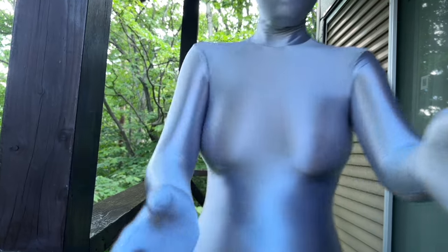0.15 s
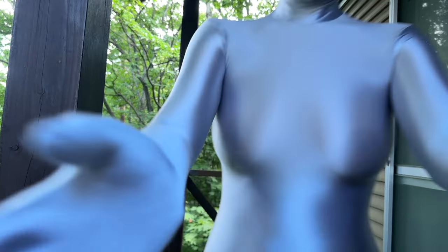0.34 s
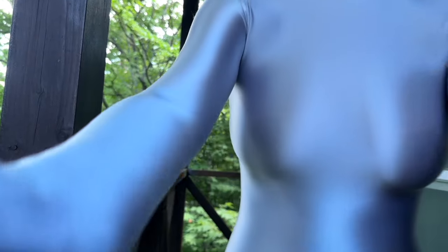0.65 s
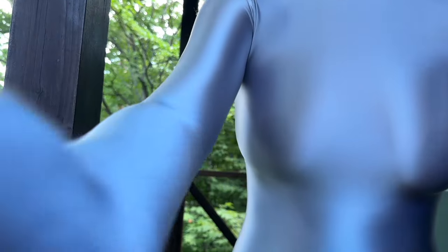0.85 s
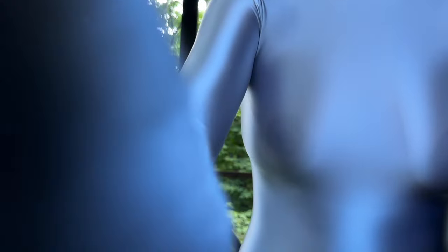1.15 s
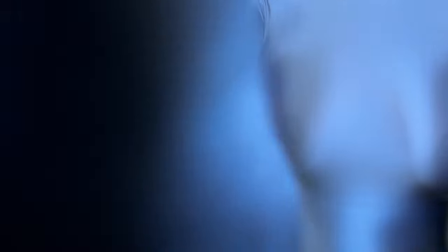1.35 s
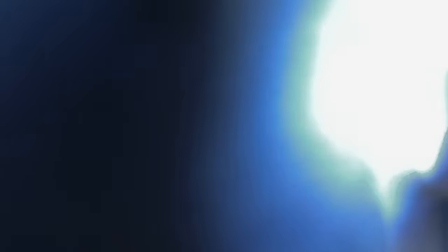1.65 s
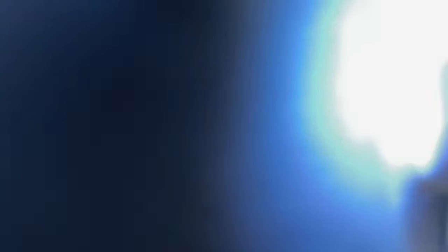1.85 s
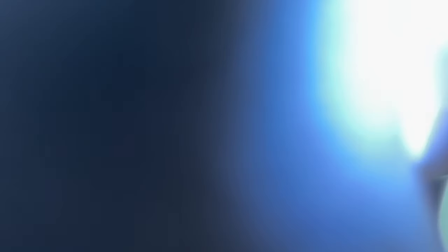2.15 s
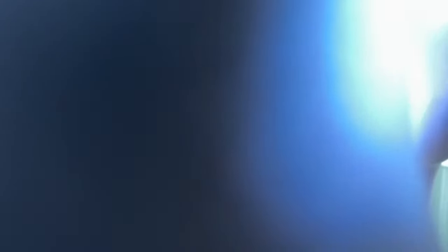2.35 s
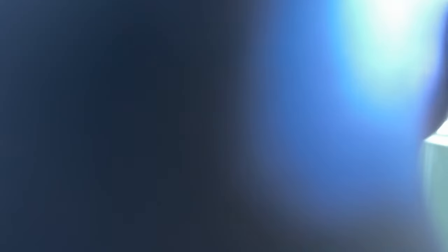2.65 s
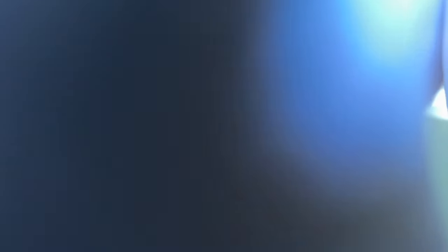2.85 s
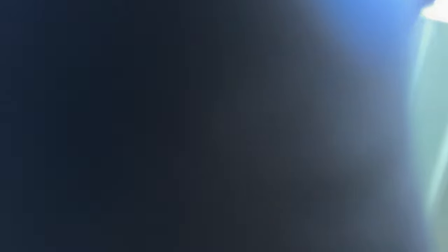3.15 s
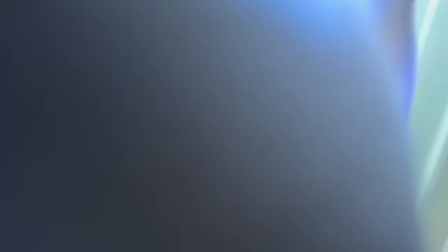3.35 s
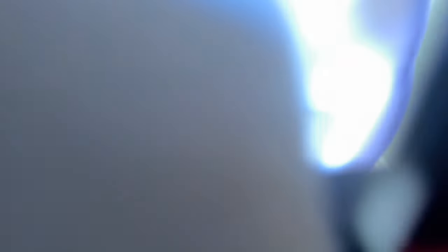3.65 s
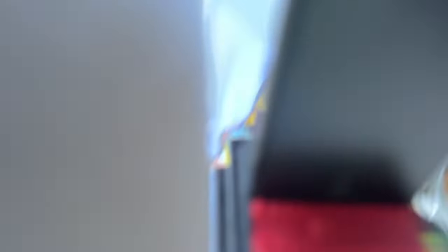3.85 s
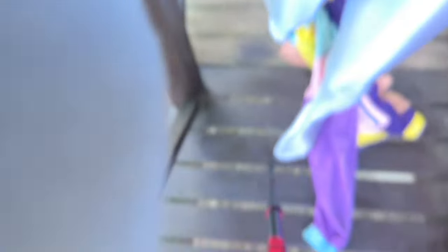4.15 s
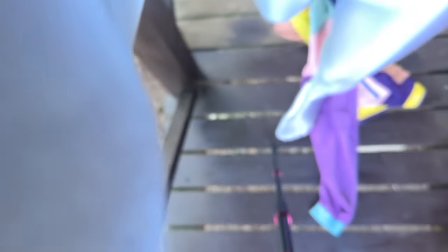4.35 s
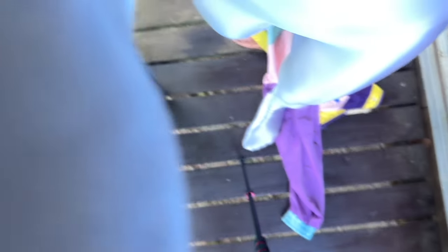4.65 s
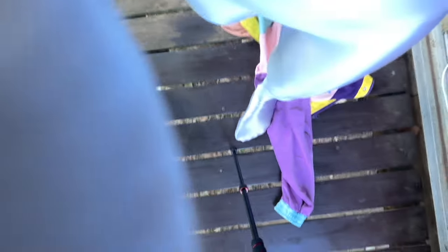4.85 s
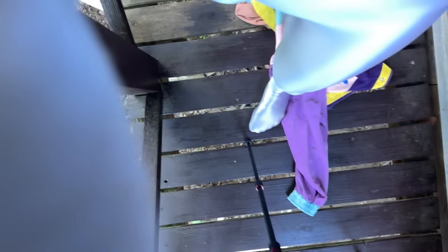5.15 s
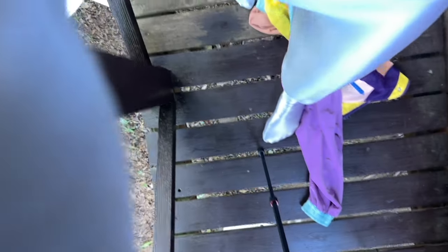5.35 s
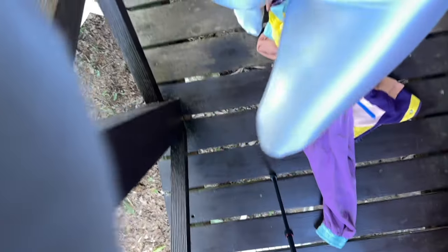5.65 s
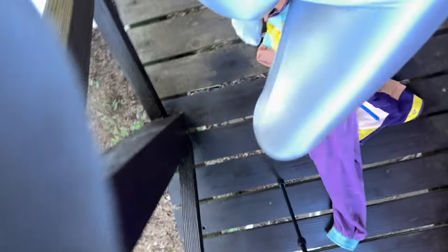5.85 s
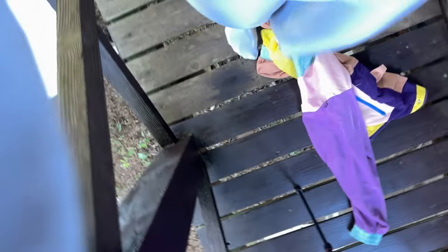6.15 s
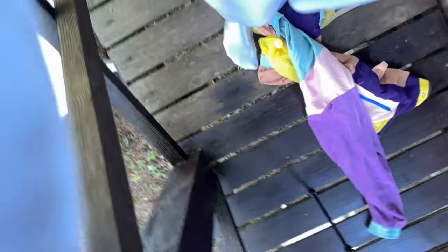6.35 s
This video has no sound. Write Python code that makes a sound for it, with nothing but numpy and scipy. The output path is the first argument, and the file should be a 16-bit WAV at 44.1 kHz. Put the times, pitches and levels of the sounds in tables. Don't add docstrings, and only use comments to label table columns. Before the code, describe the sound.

Quiet outdoor forest air: faint, steady leaf hiss, slightly hollow when a hand cups the microphone. A distant bird gives tiny flat chirps at 0-1 s, the clearest at 0.4, with a small tick and cloth swish. At 0.92 a loud hard plastic clack lands with a low thump. From 1.3 to 2.5 a bird whistles five short upward glides, soft and echoing, while knocks strike at 1.5, 1.75, 1.8 and more lightly after 2.2. Clicks at 2.7 lead into the busiest handling, 2.85-3.5: harsh grainy scrapes, a piercing chirp-like squeak near 2.93, another squeaky chatter around 3.17, rattling knocks and rocking low bumps. A last dull thump comes at 3.67. Then calm, with light sleeve rustles and faint far chirps. Two lower, richer bird notes at 4.8-5.0 open a louder phrase of five rising whistles from 5.3 to the end, ringing through trees, with a soft puff near 6.

```python
import sys
import numpy as np
from scipy import signal
from scipy.fft import rfft, irfft, next_fast_len
from scipy.io import wavfile
from scipy.ndimage import map_coordinates

SR = 44100
rng = np.random.default_rng(int(sys.argv[2]) if len(sys.argv) > 2 else 0)


def file_out(sig):
    cols = np.atleast_2d(sig).T
    lim = np.clip(cols, -1, 1)
    pcm = np.round(lim * 32767).astype(np.int16)
    wavfile.write(sys.argv[1], SR, pcm)


def gain_from_db(level_db):
    decades = np.asarray(level_db, float) / 20
    return 10 ** decades


N = 286650


def unit(x):
    return x / np.sqrt(np.mean(x ** 2) + 1e-20)


def filtered(x, response):
    m = next_fast_len(len(x) + 4096)
    return irfft(rfft(x, m) * response(np.fft.rfftfreq(m, 1 / SR)), m)[:len(x)]


def along(points):
    f, db = np.transpose(points)
    return lambda hz: gain_from_db(np.interp(np.log(hz + 1), np.log(f), db))


def resonances(modes):
    def response(f):
        total = 0
        for k, (centre, width, db) in enumerate(modes):
            damping = 1j * f * width
            total = total + (-1) ** k * gain_from_db(db) * damping / (centre * centre - f * f + damping)
        return total
    return response


def wobble(rate, size):
    knots = rng.standard_normal(int(size * rate / SR) + 4)
    return map_coordinates(knots, [np.arange(size) * rate / SR])


def noise(response, size):
    return unit(filtered(rng.standard_normal(size), response))


def add(track, s, x):
    part = track[round(s * SR):][:len(x)]
    part += x[:len(part)]


# time in seconds, grip force in dB, cupping over the microphone in dB.
HAND = [(0, -60.5, -8), (.3, -64.5, -4), (.92, -62.5, -1.5), (1.07, -61.5, 0.5), (1.38, -62, 4.5),
        (1.56, -54, 3.5), (2.35, -56, 5), (2.6, -61.5, 4.5), (2.82, -53, 2.5), (2.93, -41, 4),
        (3.03, -45, 2), (3.09, -50, 10.5), (3.26, -44, 7), (3.46, -49, 3.5), (3.65, -61.5, 1.5),
        (4.69, -61, -6), (5.77, -60.5, 0.5), (6.5, -61.5, 1)]
# start in seconds, end in seconds, hiss in dB.
STILL = (2.99, 3.066, -9)


def hand():
    s, *columns = np.transpose(HAND)
    grip_db, cup_db = (np.interp(np.arange(N) / SR, s, column) for column in columns)
    slide_from_db, slide_grows = -54.5, 0.56
    slide_db = slide_grows * np.clip(grip_db - slide_from_db, 0, None)
    start, end, still_db = STILL
    slide_db[round(start * SR):round(end * SR)] = still_db
    return grip_db, cup_db, slide_db


# frequency in Hz, level in dB per Hz.
LEAVES = [(59, -27.5), (100, -1), (167, -13.5), (204, -4), (458, -5.5), (571, -5.5), (919, -6.5),
          (1400, -8), (1780, -12), (2180, -7), (2470, -11.5), (3750, -20.5), (4600, -22.5), (8000, -33.5),
          (10400, -62), (17600, -120)]
# frequency in Hz, level in dB per Hz.
HISS = [(2000, -45), (4000, 4.5), (7000, 1.5), (10500, -6), (13000, -2), (16000, -1)]


def leaves(cup_db, slide_db):
    leaf_db, high_db = -57.5, -77
    muffle = 1
    low_level = leaf_db + slide_db + 1.2 * wobble(5.5, N) + 0.35 * wobble(2.7, N)
    high_level = high_db - muffle * cup_db + 2.2 * slide_db + 1.3 * wobble(36, N)
    return gain_from_db(low_level) * noise(along(LEAVES), N) + gain_from_db(high_level) * noise(along(HISS), N)


# frequency in Hz, level in dB per Hz.
RUMBLE = [(20, -41), (35, -13), (60, 1.5), (110, -13), (200, -11.5), (400, -51.5)]
# centre in Hz, width in Hz, level in dB.
CUP = [(1214, 650, 8), (2150, 240, 2)]


def held_body(grip_db, cup_db):
    rumble = gain_from_db(grip_db + 2.5 * wobble(16, N)) * noise(along(RUMBLE), N)
    cup = filtered(noise(resonances(CUP), N), resonances(CUP))
    return rumble + gain_from_db(-63.5 + cup_db) * unit(cup)


# start in seconds, rise in seconds, level in dB.
WHISTLES = [
    (1.275, .072, -67),
    (1.567, .085, -68.5),
    (1.845, 0.083, -67.5),
    (2.145, 0.076, -66),
    (2.432, .08, -66),
    (5.268, 0.087, -59.5),
    (5.528, .088, -59.5),
    (5.817, 0.084, -59),
    (6.085, 0.073, -57.5),
    (6.38, .072, -56.5),
]
# start and length in seconds, start and end pitch in Hz, level in dB.
OPENING = [
    (4.756, 0.061, 3290, 3465, -64.5),
    (4.975, .085, 3620, 4860, -61.5),
]
# start and length in seconds, start and end pitch in Hz, level in dB.
FAR_NOTES = [
    (0.046, 0.04, 2970, 2850, -61.5),
    (.375, 0.034, 3140, 3440, -60.5),
    (0.393, .04, 3350, 3530, -49.5),
    (0.947, 0.038, 3400, 3500, -62),
    (3.905, 0.028, 2860, 2900, -59),
    (4.173, .07, 3390, 3510, -66),
    (4.603, 0.029, 2980, 2940, -71),
]


def birds():
    out, t = np.zeros(N), np.arange(SR) / SR
    # the note, then octave at start and at end (dB), echo (dB)
    calls = []
    for s, length, db in WHISTLES:
        vary = 1 + .005 * rng.standard_normal(2)
        calls.append((s, length, 4300 * vary[0], 5400 * vary[1], db, -38, -22, 1.5 if s < 3 else 5))
    calls += [(*note, -5, -24, 4) for note in OPENING]
    calls += [(*note, -24, -26, -6) for note in FAR_NOTES]
    flick = 16
    for s, length, hz0, hz1, db, octave0_db, octave1_db, wet_db in calls:
        u = np.linspace(0, 1.3, round(1.3 * length * SR))
        rise = np.clip(u, 0, 1)
        glide = np.sin(.9 * rise ** 1.15) / np.sin(.9) - flick * np.clip(u - .96, 0, 1) ** 2
        pitch = (hz0 + (hz1 - hz0) * glide) * (1 + 0.006 * wobble(200, len(u)))
        phase = 2 * np.pi * np.cumsum(pitch) / SR
        swell = np.interp(u, [0, .1, .35, .8, .98, 1.15, 1.25], [0.01, 0.5, 0.96, 0.9, 0.63, 0.5, .01])
        octave = gain_from_db(octave0_db + (octave1_db - octave0_db) * rise) * np.sin(2 * phase)
        flutter = unit(gain_from_db(2.6 * wobble(130, len(u))))
        call = (np.sin(phase) + octave) * swell * flutter
        decay = (gain_from_db(-60 * t / .42) + gain_from_db(-7 - 60 * t / 1.5)) * (1 - np.exp(-t / .004))
        trees = rng.standard_normal(len(t)) * decay * gain_from_db(1.2 * wobble(49, len(t)))
        add(out, s, gain_from_db(db) * call)
        add(out, s, gain_from_db(db + wet_db) * signal.fftconvolve(call, trees / np.linalg.norm(trees)))
    return out


# centre in Hz, width in Hz, level in dB.
CAVITY = [(1416, 190, -2), (2100, 500, -3), (5660, 600, 0.21), (6840, 510, -2), (10500, 1302, -0.2)]


def friction(strokes):
    out = np.zeros(N)
    for start, peak, end, db, hz, width in strokes:
        size = round((end - start) * SR)
        t = start + np.arange(size) / SR
        stroke = np.sin(np.pi / 2 * np.interp(t, [start, peak, end], [0, 1, 0])) ** 1.8
        pocket = np.clip((db + 78.5) / 22, .2, 2.2)

        def band(f):
            colour = np.exp(-.5 * (np.log2((f + 1) / hz) / width) ** 2)
            gap = 1 - .6 * np.exp(-((f - 4300) / 300) ** 2)
            return colour * (1 + pocket * np.abs(resonances(CAVITY)(f))) * gap

        press = np.clip(0.04 * (db + 71.0), 0, 6)
        grain_db = press * (wobble(400, size) + 0.34 * wobble(82, size))
        add(out, start, gain_from_db(db) * stroke * unit(gain_from_db(grain_db) * noise(band, size)))
    return out


# start in seconds, length in seconds, level in dB, band width in octaves.
SWISHES = [(0, 0.2, -69.5, 3), (0.514, 0.18, -57.5, 1.3), (0.86, 0.12, -68, 1.2), (0.945, 0.8, -65, 5.9),
           (1.134, 0.17, -58.5, 4.9), (1.271, 0.16, -63.5, 2), (1.446, 0.1, -66, .8),
           (2.585, 0.09, -69, .7), (2.826, 0.12, -56, .65), (3.509, 0.3, -64.5, 2.6),
           (3.922, 0.079, -66.5, .9), (4.07, 0.1, -63.5, 1.7), (4.101, 0.96, -71, 2),
           (4.568, 0.17, -69, .6), (4.764, 0.089, -68, .76), (5.266, 0.1, -74, 0.51),
           (5.256, 0.55, -77.5, 2), (3.702, 0.48, -77.5, 2), (5.517, 0.082, -61.5, 1.2),
           (5.575, 0.05, -66, .9), (5.897, 0.24, -62, 3.3), (5.85, 0.78, -68.5, 2.3)]


def swishes():
    return friction([(s, s + 0.3 * length, s + length, db, 9660, width) for s, length, db, width in SWISHES])


# start, peak and end in seconds,
# level in dB, centre in Hz, width in octaves.
PORT = [
    (1.1, 2.3, 2.9, -66.5, 2150, .05),
    (5.551, 5.95, 6.9, -67, 1974, .07),
    (5.9, 5.99, 6.08, -59, 1500, .8),
]


def port_breaths():
    return friction(PORT)


# start, peak and end in seconds, shell level in dB, plates in dB over the shell.
SCRAPES = [(2.855, 2.875, 3.02, -47, -14), (2.929, 2.938, 2.966, -28, 6), (2.955, 2.965, 2.998, -43, -3),
           (2.984, 3.0, 3.02, -42, 1), (3.005, 3.029, 3.038, -41.5, 1), (3.067, 3.106, 3.23, -51, -4),
           (3.131, 3.198, 3.2, -35.5, 4.5), (3.196, 3.202, 3.28, -45.5, -2.5),
           (3.25, 3.338, 3.41, -40.5, -7), (3.37, 3.432, 3.62, -50.5, -9), (3.454, 3.475, 3.514, -43, -7.5),
           (3.6, 3.669, 3.67, -60, -3)]
# centre in Hz, width in octaves.
SCRAPED = [
    (1900, 0.8),
    (8500, 1.98),
    (356, 0.349),
]


def scrapes():
    strokes = []
    for *times, db, plate_db in SCRAPES:
        body_db = -44 + .8 * (db + 39)
        for level, part in zip((db, db + plate_db, body_db), SCRAPED):
            strokes.append((*times, level, *part))
    return friction(strokes)


def stick_slip(table, rough, octave_db, smear):
    out = np.zeros(N)
    for start, length, hz0, hz1, db in table:
        u = np.linspace(0, 1, round(length * SR))
        pitch = (hz0 + (hz1 - hz0) * u) * (1 + smear * wobble(580, len(u)))
        phase = 2 * np.pi * np.cumsum(pitch) / SR
        tone = np.sin(phase) + gain_from_db(octave_db) * np.sin(2 * phase) * (hz0 < 7500)
        size = 1 - rough + rough * wobble(760, len(u))
        add(out, start, gain_from_db(db + 1.5) * size * np.sin(np.pi * u) ** 0.692 * tone)
    return out


# start and length in seconds, start and end pitch in Hz, level in dB.
SQUEAKS = [
    (2.9315, 0.0135, 8970, 9000, -10.5),
    (3.157, .015, 5480, 5650, -24.5),
    (.93, 0.03, 9650, 9620, -63),
    (4.165, 0.09, 12780, 12460, -71.5),
    (4.27, 0.039, 12000, 10900, -69.5),
    (4.32, .1, 11480, 11000, -76),
    (4.42, .07, 10770, 9220, -82),
]
# start and length in seconds, start and end pitch in Hz, level in dB.
PINCH = [
    (3.095, .013, 5040, 4900, -37.5),
]
# start and length in seconds, start and end pitch in Hz, level in dB.
CHATTER = [(3.16, .035, 10400, 10700, -30), (3.18, 0.013, 7100, 7000, -30), (3.176, .02, 10000, 15000, -34),
           (3.31, .07, 6900, 6950, -49), (3.194, 0.0113, 5800, 5700, -21.5),
           (2.944, 0.016, 12000, 10500, -23.5), (2.94, .018, 3300, 3100, -26),
           (3.17, .015, 2300, 2200, -35), (5.578, 0.019, 2200, 2150, -53),
           (2.958, 0.023, 8500, 8270, -51.5), (3.29, .08, 5700, 5760, -50), (2.926, .009, 10500, 9050, -30),
           (2.94, .02, 1604, 1530, -20.5), (2.944, .016, 5100, 5240, -21),
           (2.949, 0.0072, 15100, 15200, -17), (2.978, 0.024, 1510, 1725, -35),
           (2.988, 0.025, 5400, 5150, -32.5), (2.6, 0.0046, 9500, 10300, -36),
           (3.0, .008, 13500, 13520, -33.5), (2.994, 0.021, 8900, 8500, -28.5),
           (2.996, .038, 4440, 3540, -30.5), (3.012, .02, 8300, 8340, -28),
           (3.013, .019, 12000, 11690, -32.5), (3.143, .017, 5550, 5400, -44),
           (3.172, 0.011, 5200, 5150, -22), (3.18, 0.0166, 5950, 5800, -22), (3.19, .015, 1446, 1430, -25),
           (3.205, 0.021, 5700, 5460, -39), (3.468, 0.028, 1460, 1390, -32)]


def clamp():
    clean = stick_slip(SQUEAKS, rough=0.3, octave_db=-16, smear=.006)
    pinch = stick_slip(PINCH, rough=.4, octave_db=-1, smear=.008)
    chatter = stick_slip(CHATTER, rough=0.62, octave_db=-14, smear=.02)
    return clean + pinch + chatter


def ring(modes, t):
    total = 0
    for hz, db, t60 in modes:
        total = total + gain_from_db(db + rng.normal(0, 1.5) - 60 * t / t60) * np.sin(2 * np.pi * hz * t)
    return total * (1 - np.exp(-t / .002))


# time in seconds, peak level in dB, rocking rate in Hz.
BUMPS = [(0.937, -35, 63), (1.189, -50, 93), (1.224, -45, 54), (1.536, -39.5, 97), (1.747, -45.5, 136),
         (1.885, -52, 69.4), (2.002, -41, 56.5), (2.27, -41, 56.5), (2.716, -48.5, 134),
         (2.812, -42.5, 111), (2.862, -35, 99), (2.887, -32, 129), (2.8953, -26, 76), (2.924, -27.5, 117),
         (2.964, -23, 59.97), (3.027, -35, 61.5), (3.069, -35, 86.5), (3.117, -34, 122.1),
         (3.199, -43, 116), (3.5042, -28, 68), (3.541, -43.5, 61.4), (3.671, -46, 61.6), (4.598, -47, 68.7),
         (5.329, -56, 54)]


def rocking():
    out, t = np.zeros(N), np.arange(SR // 4) / SR
    for s, db, hz in BUMPS:
        t60 = 0.16 * (80 / hz) ** .4
        modes = [(hz, 0, t60), (.65 * hz, -7, 2.5 * t60), (1.45 * hz, -8, 0.67 * t60)]
        add(out, s, gain_from_db(db + 3) * ring(modes, t))
    return out


# centre in Hz, width in Hz, level in dB.
PLATE = [(4500, 1900, -1), (6507, 1760, -1.5), (8480, 1900, -3.5), (10260, 1300, -1), (12500, 1500, -6),
         (14500, 1400, -10.5)]


def plates(f):
    return (1j * f / (1j * f + 3000)) ** 2 * resonances(PLATE)(f)


# time in seconds, peak level in dB.
TICKS = [(.1544, -53), (.182, -38.5), (1.4348, -43), (1.5104, -34), (1.6237, -50), (1.6497, -51),
         (1.688, -50), (1.9154, -61), (1.938, -60), (2.6753, -50), (2.6854, -54), (1.631, -44),
         (1.682, -52), (2.057, -49), (2.813, -47), (2.7017, -51), (2.7306, -58), (2.7377, -50),
         (2.8647, -28), (3.2793, -44), (3.403, -34), (3.4254, -44), (3.462, -46), (3.4753, -38),
         (6.394, -46.5)]


def ticks():
    out, t = np.zeros(N), np.arange(400) / SR
    for s, db in TICKS:
        tick = filtered(rng.standard_normal(400) * gain_from_db(-60 * t / 0.0088), plates)
        add(out, s - .0003, gain_from_db(db - 4.5) * tick / np.abs(tick).max())
    return out


# centre in Hz, width in Hz, level in dB.
SHELL = [(1204, 1200, -4), (2200, 2090, 0.5), (3803, 2000, -6)]
# frequency in Hz, level in dB, t60 in seconds.
BODY = [(183, -17, 0.11), (291, 1.5, 0.07), (364, 2, 0.036), (440, -5, .06), (563, -9, 0.017)]
# time in seconds, shell level in dB, bright crack and body knock
# in dB over the shell, struck spot in Hz.
KNOCKS = [(.9219, -25, -2, -23.5, 2200), (0.9247, -18, 9, 0, 990), (0.9266, -12, -6, -45, 4500),
          (1.5303, -18, 4, -12, 1920), (1.5394, -25.5, -2.5, -13, 2100), (1.7464, -27.5, -15, -8.5, 2150),
          (1.8165, -18.5, 4, -20, 1600), (1.8172, -17, -23, -40, 3920), (2.2012, -30, -7, -7, 1800),
          (2.268, -30.5, -8.5, -6, 1900), (2.345, -30.5, -15.5, -12, 1900), (2.4678, -32.5, -24, -13, 1900),
          (2.7085, -18.5, -14, -38, 1950), (2.715, -21, 1, -27, 3350), (2.861, -22.5, -24, -23.5, 1990),
          (2.8789, -28, -35, -11, 2070), (2.9151, -32, -30, -20, 2003), (2.9177, -24, -26, -14.5, 2040),
          (2.9267, -25, -10.5, -8, 1460), (2.9335, -21, -12, -19.5, 1500), (3.0682, -26, -7.5, -17, 2620),
          (3.0793, -25, -30, -33, 1460), (3.1178, -25, -10.5, -27.5, 1450),
          (3.4736, -30.5, -14.5, -6, 1590), (3.4874, -21, -17.5, -12.5, 1400),
          (3.499, -39.5, -14.5, -19.5, 2400)]
# time in seconds, shell level in dB, body knock in dB over the shell.
TOUCHES = [
    (1.1877, -44, -6),
    (1.6304, -35, -2),
    (1.68, -40.5, 6),
    (2.0006, -50, 1),
    (2.038, -54, 6),
    (2.0553, -36, -11),
    (2.259, -41, -10),
    (2.813, -40, -7),
    (3.513, -41, -16.5),
    (3.6743, -45.5, 9),
]


def knocks():
    out, t = np.zeros(N), np.arange(SR // 4) / SR
    hit_t60, spot_db = 0.012, 5
    rattle = gain_from_db(-12.5 - 60 * t / (3.3 * hit_t60))
    blow = (gain_from_db(-60 * t / hit_t60) + rattle) * (1 - np.exp(-t / 0.00023))
    touches = [(s, db, -22, knock_db, 1110) for s, db, knock_db in TOUCHES]
    for s, db, crack_db, knock_db, hz in KNOCKS + touches:
        hit = rng.standard_normal((2, len(t))) * blow
        hit[:, 12] += [5.5, 2.5]

        def struck_shell(f):
            dull = (1j * f / (1j * f + 520)) ** 2 / (1 + 1j * f / 6000) ** 3
            return dull * (resonances(SHELL)(f) + resonances([(hz, .3 * hz, spot_db)])(f))

        shell = filtered(hit[0], struck_shell)
        plate = filtered(hit[1] * gain_from_db(-60 * t / .06), plates)
        crack = shell / np.abs(shell).max() + gain_from_db(crack_db) * plate / np.abs(plate).max()
        loss_db = np.clip(-.6 * (db + knock_db + 20), 0, 12)
        body = [(c, level - loss_db * (c < 320), t60) for c, level, t60 in BODY]
        add(out, s - .0003, gain_from_db(db) * (crack + gain_from_db(knock_db - 3.5) * ring(body, t)))
    return out


def scene():
    grip_db, cup_db, slide_db = hand()
    background = leaves(cup_db, slide_db) + held_body(grip_db, cup_db) + birds()
    rubs = swishes() + port_breaths() + scrapes()
    handling = rubs + clamp() + rocking() + ticks() + knocks()
    return (background + handling)[None]


def band_limit(x):
    return signal.sosfilt(signal.butter(12, 16660, fs=SR, output="sos"), x)


def record(dry):
    top_hz, cut_hz = 15900, 16650
    x = filtered(dry[0], lambda hz: (1j * hz / (1j * hz + 38)) ** 3)
    x = x / (1 + np.abs(x / .48) ** 4) ** (1 / 4)
    x = filtered(x, lambda hz: np.where(hz < top_hz, 1, gain_from_db(-34)) * (hz < cut_hz))
    return band_limit(x[None])


dry = scene()
out = record(dry)
file_out(out)
```